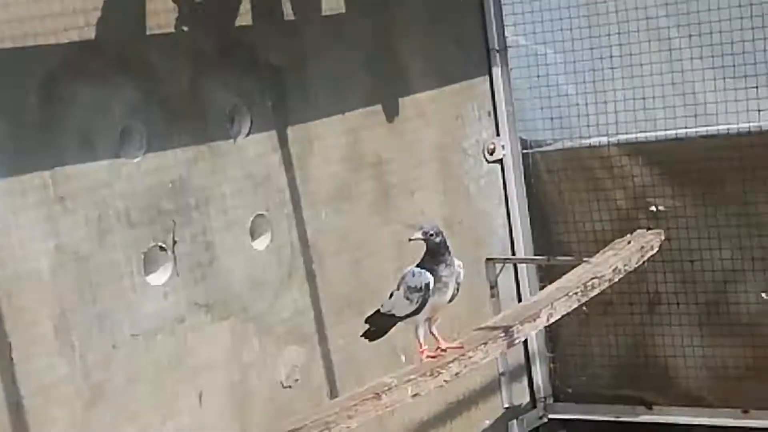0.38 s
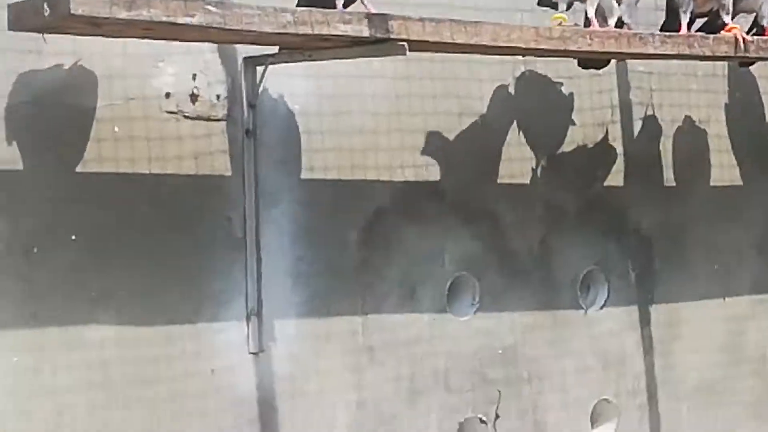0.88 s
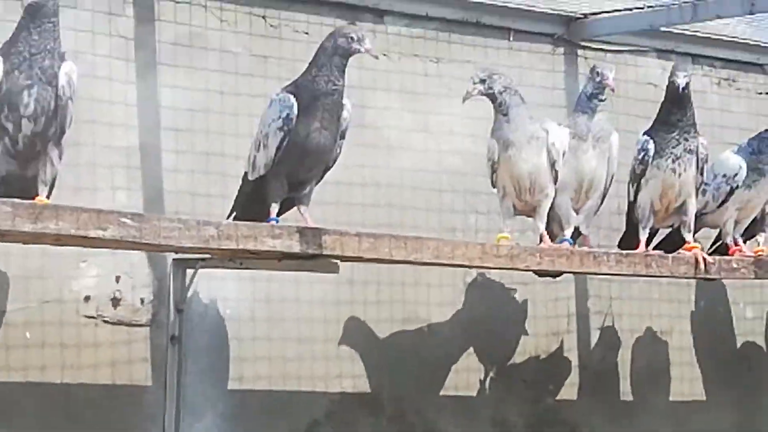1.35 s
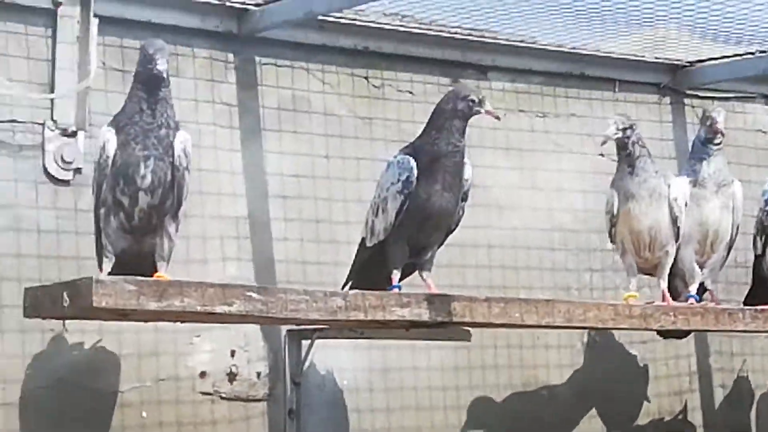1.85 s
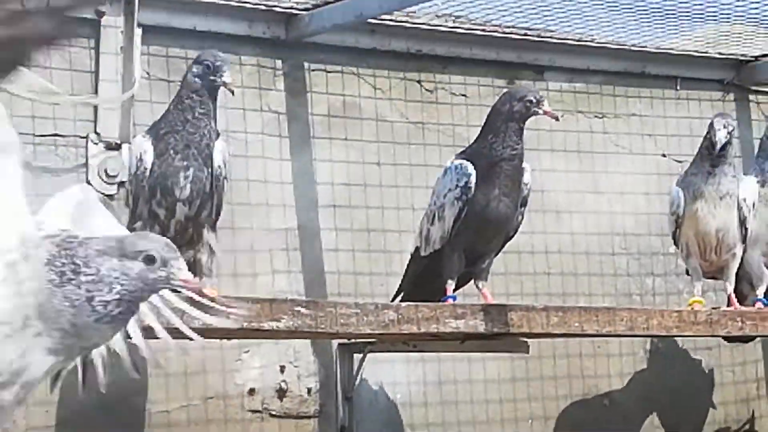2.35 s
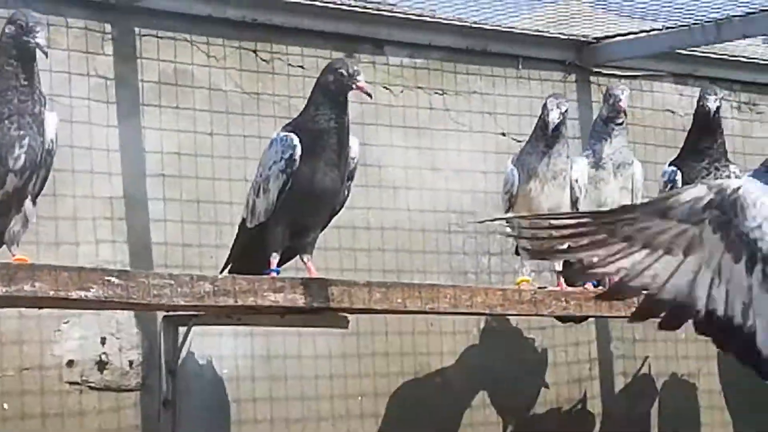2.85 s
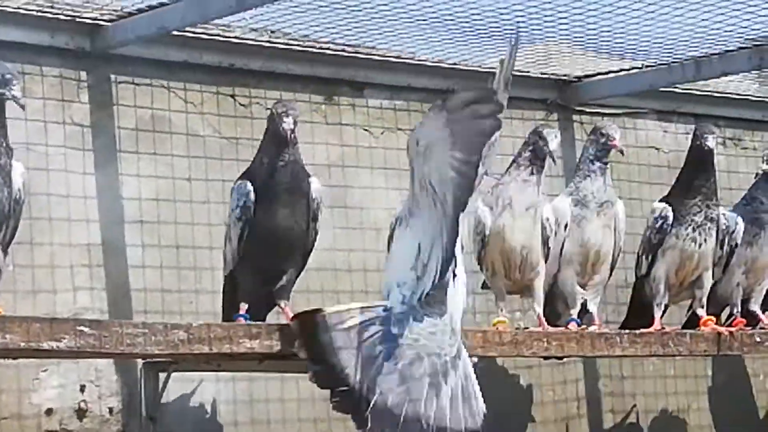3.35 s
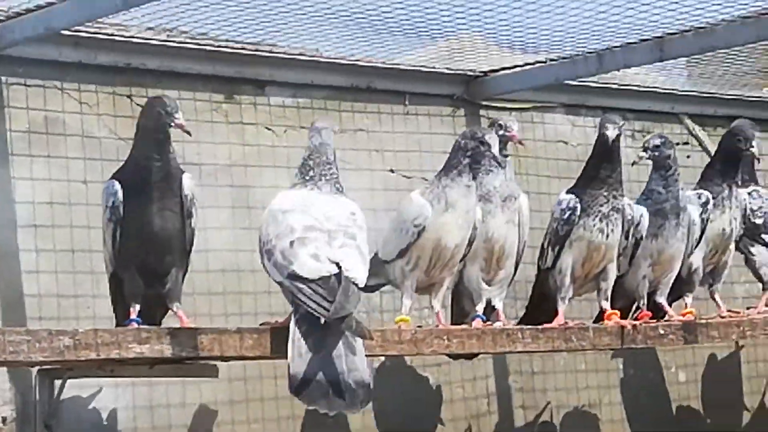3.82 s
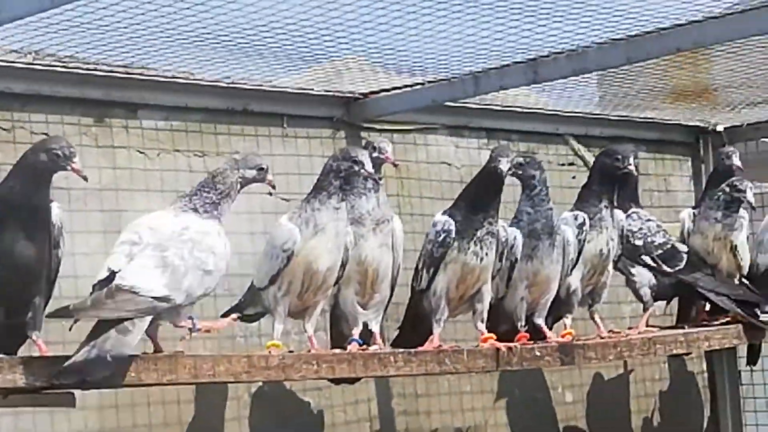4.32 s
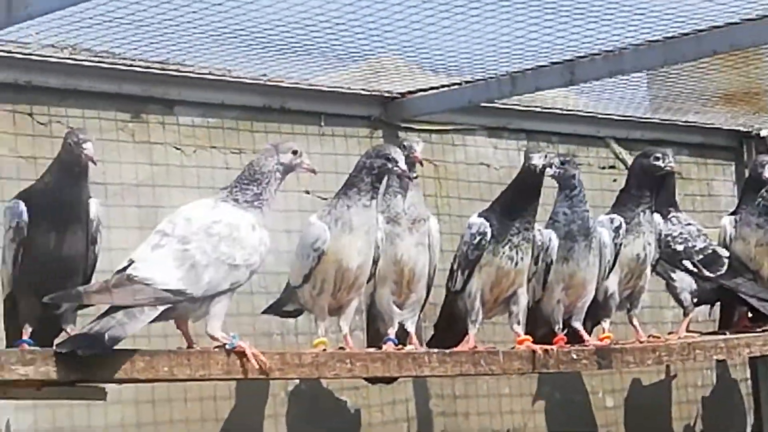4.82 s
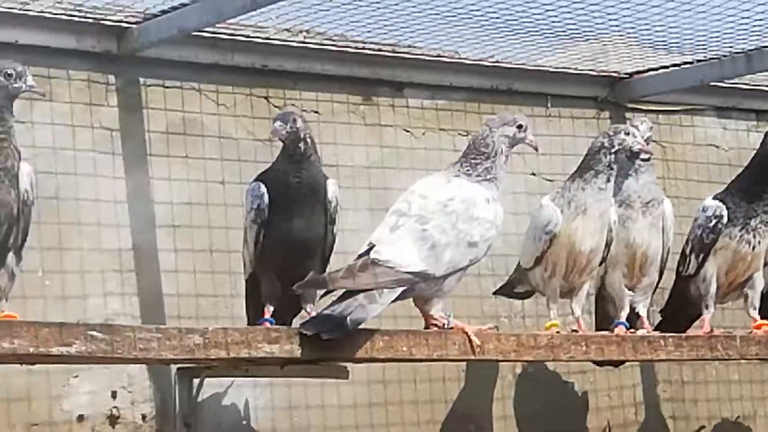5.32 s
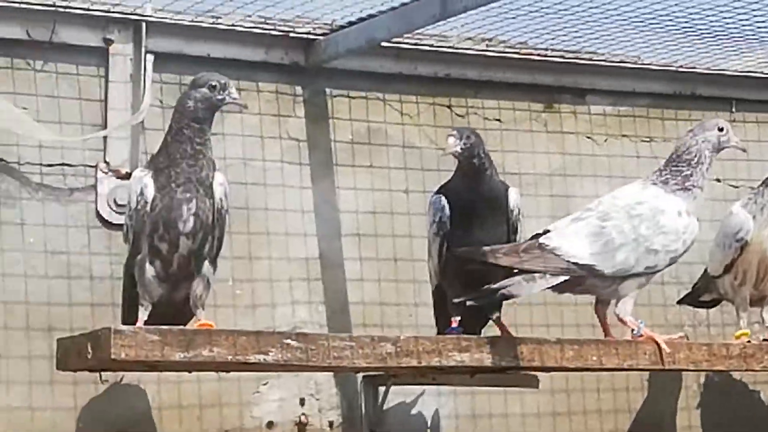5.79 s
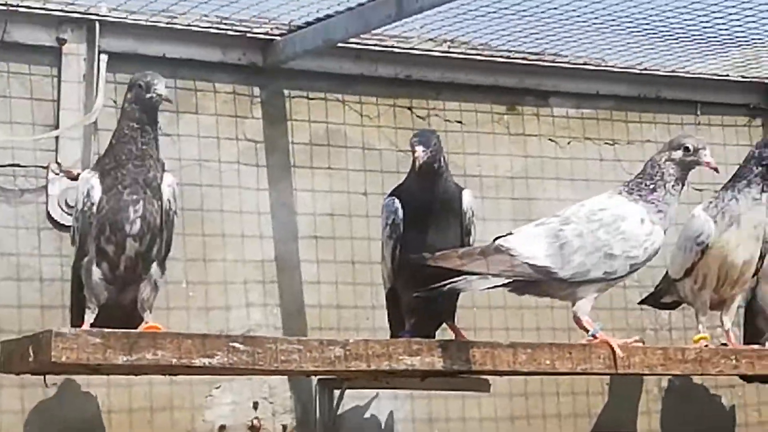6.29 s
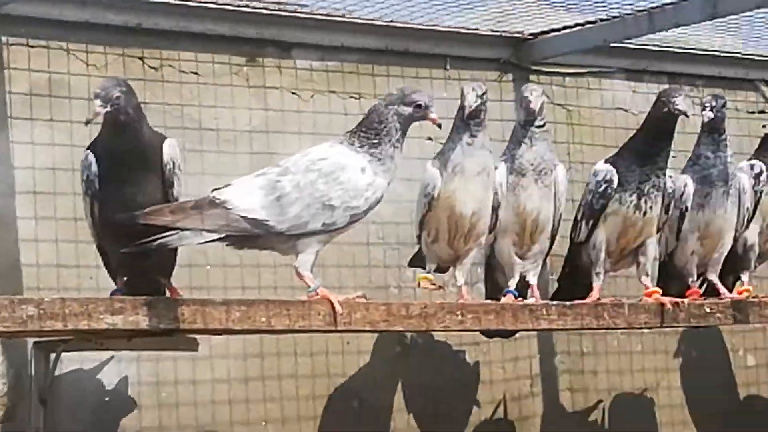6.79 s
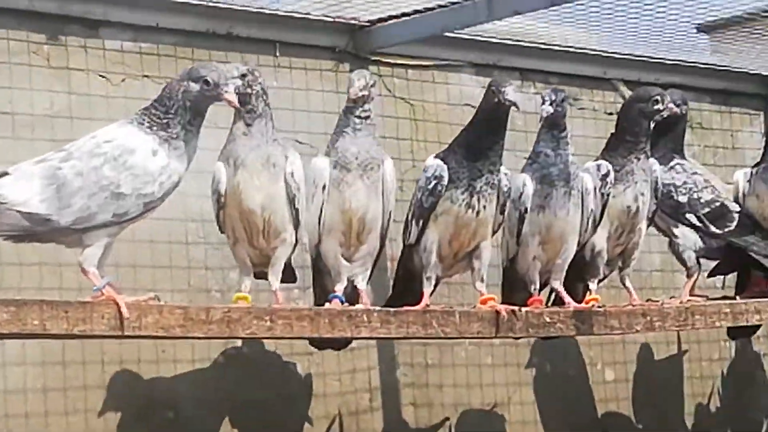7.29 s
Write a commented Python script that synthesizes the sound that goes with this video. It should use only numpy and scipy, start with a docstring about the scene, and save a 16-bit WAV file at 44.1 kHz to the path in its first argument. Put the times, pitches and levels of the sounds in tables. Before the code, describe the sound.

Young pigeons cheep hoarsely in a crowd inside a wire loft while one bird flaps past, claps its wings loudly and lands scuffling among soft coos.

```python
"""Young birds cheep hoarsely in a crowd on the right of an open wire pigeon loft; their calls are shaky tones.
Two adults coo and short hollow hoots sound ahead, as throbbing near-pure tones, among clucks and airy bands.
One pigeon flies past with swishing strokes of shaped noise, snapping quills and one loud resonant clap,
and lands in a scuffle of decaying knocks. A small bird twitters in upward chirps.
Draught and a light breeze buffet a two-port microphone as lumpy low noise over a far rumble."""
import sys
import numpy as np
from scipy import signal
from scipy.fft import rfft, irfft, next_fast_len
from scipy.io import wavfile
from scipy.ndimage import uniform_filter1d, map_coordinates

SR = 44100
rng = np.random.default_rng(int(sys.argv[2]) if len(sys.argv) > 2 else 0)


def file_out(sig):
    """Save sig as 16-bit WAV at sys.argv[1]."""
    # one column per channel
    cols = np.atleast_2d(sig).T
    # limit, then scale
    lim = np.clip(cols, -1, 1)
    pcm = np.round(lim * 32767).astype(np.int16)
    wavfile.write(sys.argv[1], SR, pcm)


def ratio(d):
    """dB to gain"""
    e = np.asarray(d, float) / 20
    return 10 ** e


N = 337806
LAG = 26  # samples by which the left port hears later a source on the right

# relative spectrum of feather hiss: f/Hz, level/dB
FEATHER_SPECTRUM = [(2000, -120), (2500, -9), (4500, -2), (8000, 2.5), (12000, -5.5), (15500, -14)]
# churned air while the bird brakes: start t/s, rise/s, hold/s, fall/s, level/dB
BRAKING_AIR = (2.27, .08, .45, .25, -59)
# feathers rustling in flight: start t/s, rise/s, hold/s, fall/s, hiss level/dB, whoosh level/dB
FLIGHT_RUSTLE = (.8, 1.03, 0.32, 1, -57.5, -55.5)


def unit(x):
    """Normalization: scale to rms 1."""
    return x / np.sqrt(np.mean(x ** 2) + 1e-20)


def along(points, hz):
    """Logarithmic frequency scale: (f/Hz, value) points interpolated on a log axis."""
    f, v = np.transpose(points)
    return np.interp(np.log(hz + 1), np.log(f + 1), v)


def curve(rows):
    """Linear interpolation: one value per sample for the column after the time."""
    return np.interp(np.arange(N) / SR, *np.transpose(rows))


def plateau(*steps):
    """Trapezoidal envelope, 0 to 1 and back: start, rise, hold and fall in seconds."""
    return np.interp(np.arange(N) / SR, np.cumsum(steps), [0, 1, 1, 0])


def wobble(rate, size=N, order=3):
    """Band-limited random modulation: a curve through random knots, rate of them a second."""
    knots = rng.standard_normal(int(size * rate / SR) + 4)
    return map_coordinates(knots, [np.arange(size) * rate / SR], order=order)


def add(track, start, sound):
    """Superposition: mix a sound in at a time in seconds."""
    part = track[max(round(start * SR), 0):][:len(sound)]
    part += sound[:len(part)]


def filtered(x, response):
    """Linear filtering: the spectrum of x times a complex response of frequency."""
    m = next_fast_len(N + SR // 2)
    return irfft(rfft(x, m) * response(np.fft.rfftfreq(m, 1 / SR)), m)[..., :N]


def noise(spectrum, alike=((1, 0),)):
    """Partial coherence: stereo noise of rms 1 with a spectrum and a left-right correlation."""
    def gains(hz):
        angle = np.arccos(np.clip(along(alike, hz), -1, 1)) / 2
        return ratio(along(spectrum, hz)) * np.array([np.cos(angle), np.sin(angle)])

    mid, side = filtered(rng.standard_normal((2, N)), gains)
    return unit(np.array([mid + side, mid - side]))


def band(size, hz, width_hz):
    """Band-pass filtering: noise of rms 1 in a Gaussian band round hz."""
    f = np.fft.rfftfreq(size, 1 / SR)
    response = np.exp(-((f - hz) / width_hz) ** 2)
    return unit(irfft(rfft(rng.standard_normal(size)) * response, size))


def patchy(x, depth_db):
    """Time-frequency modulation: random patches of gain, then rms 1."""
    z = signal.stft(x, nperseg=512)[2]
    field = rng.standard_normal(z.shape[1:])
    field = uniform_filter1d(uniform_filter1d(field, 3, 0), 16, 1)
    return unit(signal.istft(z * ratio(depth_db * unit(field)), nperseg=512)[1][:, :N])


def loft(x, wet_db, lag):
    """Time difference and reverberation: the left port lags; the reverberant tail is new every 0.4 s."""
    # reverberation time of the loft: f/Hz, t60/s
    decay_times = [(300, 0.43), (2000, 0.37), (6000, 0.19), (14000, 0.14)]
    out = np.array([np.pad(x, (lag, 0))[:N], x])
    step = SR * 4 // 10
    for a in range(0, N, step):
        hz, t, z = signal.stft(rng.standard_normal((2, SR // 4)), SR, nperseg=256)
        decay = ratio(-60 * t / along(decay_times, hz)[:, None])
        tail = signal.istft(z * decay, SR, nperseg=256)[1]
        wet = signal.fftconvolve(x[None, a:a + step], tail / np.linalg.norm(tail[0]), axes=1)
        part = out[:, a + 200:][:, :wet.shape[1]]
        part += ratio(wet_db) * wet[:, :part.shape[1]]
    return out / np.sqrt(1 + ratio(2 * wet_db))


def air():
    """Turbulent pressure fluctuation: lumpy buffeting at the ports over a steady far rumble."""
    # air on the ports, before random lumps: t/s, level/dB
    draught = [(0.0, -46), (0.13, -63), (0.17, -40.5), (0.3, -44), (0.45, -60), (2.05, -51.5), (2.18, -56),
               (2.43, -55), (2.47, -47), (2.64, -46), (2.77, -49), (3.07, -51.5), (3.15, -59), (5.01, -56),
               (5.18, -56.5), (7.66, -57.5)]
    # relative spectrum of the buffeting: f/Hz, level/dB
    buffet_spectrum = [(15, -9.5), (30, -8), (80, -3.5), (160, -12), (350, -27.5), (600, -120)]
    # relative spectrum of far traffic: f/Hz, level/dB
    rumble_spectrum = [(35, -63), (60, -19), (92, -15), (113, -8.5), (160, -3), (188, -8.5), (221, -9),
                       (618, -18), (1180, -18.5), (2000, -10.5), (2600, -10), (4400, -120)]
    # left-right correlation: f/Hz, correlation/1
    likeness = [(60, 0.99), (130, 0.99), (290, 0.71), (640, -0.42), (1400, -0.12)]
    rumble_db = -56.5
    lumps = ratio(curve(draught) + 2.4 * wobble(8.7))
    return lumps * noise(buffet_spectrum, likeness) + ratio(rumble_db) * noise(rumble_spectrum, likeness)


def twitter():
    """Linear frequency modulation: each chirp of a small bird sweeps up through the treble in 25 ms."""
    # quick upward chirps: t/s, level/dB
    chirps = [(6.71, -41.5), (6.748, -46), (6.769, -41.5), (6.805, -49)]
    out, t = np.zeros(N), np.arange(SR // 40) / SR
    chirp = np.hanning(len(t)) * np.sin(2 * np.pi * (7000 * t + 55000 * t ** 2))
    for s, db in chirps:
        add(out, s, ratio(db) * chirp)
    return out


def cheep(length, hz, scatter_hz, overtone_db=-21, flutter_db=6.0):
    """Random frequency and amplitude modulation of a syrinx tone; also returns its swell."""
    sag_per_s = 0.123  # a call sinks by this share of its pitch each second as the breath runs out
    size = int(length * SR) + 9
    sag = sag_per_s * (length / 2 - np.arange(size) / SR)
    shake = 1.3 * wobble(420, size, order=1) + .35 * wobble(25, size, order=1)
    phase = 2 * np.pi * np.cumsum(hz * (1 + sag) + scatter_hz * shake) / SR
    u = np.arange(size) / size
    swell = np.minimum(u / .13, 1) ** 1.5 * np.minimum((1 - u) / .3, 1)
    # only calls below 6600 Hz have the octave overtone
    tone = np.sin(phase) + ratio(overtone_db) * (hz < 6600) * np.sin(2 * phase)
    return unit(tone * ratio(flutter_db * wobble(129.9, size, order=1))) * swell, swell


def cheeps(table):
    """Superposition of a table of calls: their tones, and the power of the air that drives them."""
    tones, effort = np.zeros((2, N))
    for s, length, hz, scatter_hz, db in table:
        tone, swell = cheep(length, hz, scatter_hz)
        add(tones, s, ratio(db) * tone)
        add(effort, s, (ratio(db) * swell) ** 2)
    return tones, effort


def flock(count=450):
    """Incoherent summation: clear cheeps, many weak ones, rasping breath with the clear ones, and rustle."""
    # the clearest single cheeps: start t/s, length/s, pitch f/Hz, pitch scatter scale/Hz, level/dB
    clear_cheeps = [(0.0, 0.11, 4110, 76, -37), (0.049, 0.16, 4990, 210, -40), (0.194, 0.13, 3800, 36, -38),
                    (0.351, 0.12, 5460, 207, -38.5), (0.415, 0.093, 4740, 115, -38.5),
                    (0.51, 0.094, 4890, 215, -38), (0.425, 0.09, 9260, 52, -51),
                    (0.483, 0.084, 3915, 64, -44), (0.577, 0.17, 5850, 150, -43.5),
                    (1.1, 0.083, 5760, 51, -47.5), (1.125, 0.16, 3396, 23, -44.5),
                    (1.26, 0.093, 2800, 46, -49), (1.29, 0.12, 3490, 60, -42),
                    (1.252, 0.081, 4660, 180, -41), (1.351, 0.12, 4250, 220, -41),
                    (1.447, 0.18, 4123, 158, -37), (1.555, 0.07, 4610, 63, -39),
                    (1.62, 0.16, 2735, 62, -47.5), (1.7, 0.15, 6060, 270, -42),
                    (1.749, 0.16, 3485, 106, -47), (2.255, 0.093, 5870, 120, -44.5),
                    (2.653, 0.078, 6300, 210, -41.5), (2.68, 0.19, 3454, 51, -45),
                    (3.007, 0.066, 4400, 165, -37), (3.062, 0.14, 3640, 79, -39),
                    (3.226, 0.1, 5720, 280, -35), (3.311, 0.099, 4750, 120, -39.5),
                    (3.433, 0.12, 4620, 79, -42), (3.47, 0.086, 5720, 270, -40),
                    (3.563, 0.17, 5640, 59, -40), (3.643, 0.089, 5720, 70, -43),
                    (3.668, 0.21, 4540, 186, -34.5), (3.869, 0.088, 4420, 107, -39.5),
                    (3.949, 0.1, 4100, 157, -39), (4.17, 0.18, 5100, 75, -52), (4.323, 0.1, 4810, 92, -44),
                    (4.411, 0.066, 3610, 96, -45), (4.428, 0.13, 3040, 109, -46),
                    (4.57, 0.082, 5420, 74, -43), (4.641, 0.094, 4390, 69, -43.5),
                    (4.892, 0.09, 4630, 69, -41.5), (4.947, 0.077, 5440, 73, -37.5),
                    (4.985, 0.063, 3830, 127, -39.5), (5.105, 0.058, 3630, 68, -37),
                    (5.207, 0.096, 4766, 103, -35.5), (5.376, 0.09, 7930, 110, -47),
                    (5.389, 0.28, 5270, 77, -40), (5.527, 0.1, 2656, 46, -48),
                    (5.69, 0.097, 2827, 100, -48), (5.795, 0.064, 4860, 66, -35),
                    (5.898, 0.066, 5100, 123, -35), (6.0, 0.043, 5000, 110, -36),
                    (6.06, 0.041, 4805, 77, -37), (5.9, 0.37, 2455, 32, -55),
                    (6.08, 0.24, 7250, 450, -43.5), (6.131, 0.094, 3930, 220, -39.5),
                    (6.215, 0.056, 5880, 170, -33.5), (6.28, 0.054, 6060, 210, -35.5),
                    (6.2, 0.051, 4880, 165, -35), (6.285, 0.082, 4820, 100, -36),
                    (6.368, 0.2, 4130, 102, -41.5), (6.45, 0.22, 2940, 124, -46.5),
                    (6.473, 0.13, 3490, 126, -42.5), (6.69, 0.15, 2716, 37, -48),
                    (7.005, 0.067, 2720, 48, -54), (7.375, 0.077, 2660, 61, -48),
                    (7.081, 0.21, 3745, 20, -49.5), (7.207, 0.31, 8130, 82, -49),
                    (7.131, 0.16, 6130, 110, -41.5), (7.223, 0.14, 4100, 62, -39.5),
                    (7.35, 0.13, 5500, 160, -40.5), (7.389, 0.064, 3760, 96, -38),
                    (7.461, 0.091, 5620, 180, -38), (7.486, 0.047, 6360, 95, -38),
                    (7.55, 0.1, 5940, 330, -35), (7.579, 0.059, 4080, 38, -40.5)]
    # the rest of the flock, too dense to tell apart: t/s, relative level/dB
    crowd = [(0.0, -40), (0.43, -46), (0.77, -47.5), (1.11, -50), (1.43, -44), (2.52, -48), (3.69, -41),
             (4.95, -45.5), (5.08, -46), (5.65, -47.5), (6.36, -43), (6.87, -47.5), (7.12, -46.5),
             (7.36, -45), (7.66, -38.5)]
    # relative spectrum of rasp and rustle: f/Hz, level/dB
    crowd_spectrum = [(530, -28), (900, -23), (1770, -20.5), (2540, -7.5), (3420, -3), (4130, 2),
                      (4880, 3.5), (6580, -6), (8340, -9), (11600, -23.5), (15500, -38.5)]
    tones, effort = cheeps(clear_cheeps)
    when, length, pitch, size, rough = rng.random((count, 5)).T
    weak = [when * N / SR, .05 + .12 * length, 2600 * 2.8 ** pitch, 50 + 130 * rough, -7 * size]
    babble = cheeps(np.transpose(weak))[0]
    level = ratio(curve(crowd))
    rasp = np.sqrt(np.abs(uniform_filter1d(effort, 400)))
    rustle = patchy(noise(crowd_spectrum), depth_db=3.5) * (0.89 * level + ratio(-10) * rasp)
    calls = tones + twitter() + ratio(-8) * level * unit(babble)
    return loft(calls, wet_db=1.5, lag=LAG) + rustle


def airy_bands():
    """Band-limited noise: airy low parts of cheeps, and other soft bands of breath, without a tone."""
    # soft airy bands: start t/s, length/s, centre f/Hz, width/Hz, level/dB
    soft_bands = [(0.0, 0.12, 1720, 265, -44), (0.083, 0.25, 1690, 282, -50), (0.61, 0.21, 940, 250, -56.5),
                  (4.029, 0.14, 1846, 300, -55), (4.517, 0.28, 1790, 400, -56.5),
                  (5.049, 0.33, 1885, 418, -56.5), (6.077, 0.22, 9600, 2600, -48),
                  (7.05, .34, 1790, 378, -55.5)]
    out = np.zeros(N)
    for s, length, hz, width_hz, db in soft_bands:
        size = int(length * SR)
        add(out, s, ratio(db) * signal.windows.tukey(size, .5) * band(SR // 2, hz, width_hz)[:size])
    return out


def clucks():
    """Modulated syrinx tones: clucks and whines from ahead."""
    # start t/s, length/s, pitch f/Hz, pitch scatter scale/Hz, level/dB
    cluck_calls = [(.2, 0.25, 1775, 11, -53), (.8, 0.059, 1470, 39, -53.5), (.9, 0.16, 900, 32, -60),
                   (1.965, 0.026, 788, 44, -50.5), (2.37, 0.272, 1490, 31, -58),
                   (2.572, 0.039, 810, 28, -42), (6.825, 0.16, 915, 50, -65.5)]
    return cheeps(cluck_calls)[0]


def throat(calls, throb_db, throb_rate, scatter_hz, haze):
    """Amplitude and frequency modulation: a near-pure closed-beak tone throbs, shakes and can gurgle."""
    gurgle_hz = 27  # the throat opens and shuts this often in a rolling coo
    out = np.zeros(N)
    for rows in calls:
        s, hz, db, depth = np.transpose(rows)
        t = np.arange(s[0], s[-1], 1 / SR)
        pitch = np.interp(t, s, hz) + scatter_hz * wobble(58.9, len(t))
        phase = 2 * np.pi * np.cumsum(pitch) / SR
        breathy = 1 + haze * wobble(250, len(t))  # turbulent air spreads a haze round the tone
        shut = np.cos(np.pi * gurgle_hz * t + .5 * wobble(12, len(t))) ** 4
        gurgle = 1 - np.clip(np.interp(t, s, depth), 0, 1) * shut
        throb = ratio(throb_db * wobble(throb_rate, len(t))) * gurgle
        add(out, s[0], np.sqrt(2) * ratio(np.interp(t, s, db)) * throb * np.sin(phase) * breathy)
    return out


def hoots():
    """Envelope shaping: each hoot swells quickly, holds and fades while its pitch sags."""
    # short hollow hoots: start t/s, hold/s, pitch f/Hz, level/dB
    hoot_calls = [(.6, 0.083, 678, -41), (.745, 0.094, 660, -60), (.9, 0.059, 640, -60),
                  (1.775, 0.017, 686, -52), (1.835, 0.015, 680, -51.5), (3.412, 0.0059, 674, -47),
                  (3.485, 0.035, 676, -57), (4.345, 0.011, 496, -59)]
    attack_s, release_s, sag_hz_per_s = 0.024, 0.029, 45
    edge_db = np.array([-18, 0, 0, -18])  # level at the ends of the swell and fade
    calls = []
    for start, held, hz, db in hoot_calls:
        s = np.cumsum([0, attack_s, held, release_s])
        calls.append(np.transpose([start + s, hz - sag_hz_per_s * s, db + edge_db, 0 * edge_db]))
    return throat(calls, throb_db=1.5, throb_rate=60, scatter_hz=8, haze=.32)


def coos():
    """Pitch glide: the first coo sinks to a long low note, the second arches up and sinks; both gurgle."""
    # one list per coo: t/s, pitch f/Hz, level/dB, gurgle depth/1
    coo_calls = [
        [(2.57, 441.4, -58, 0.9), (2.68, 400, -49, 1), (2.72, 346.7, -50.5, 0.5), (2.86, 346, -50, .3),
         (3.03, 336, -57.5, 0.5), (3.07, 330, -77, .2)],
        [(3.82, 298, -67, .1), (3.84, 305, -62, .1), (3.92, 400.7, -54, 0.2), (4.048, 454.4, -59.5, 0.7),
         (4.09, 402.6, -54.5, 1), (4.17, 369, -49, 0.7), (4.22, 347.4, -45.5, 0), (4.29, 352.5, -42.5, 0.8),
         (4.35, 319, -55, 1), (4.41, 323, -64, .9)],
    ]
    return throat(coo_calls, throb_db=1.5, throb_rate=30, scatter_hz=8, haze=.25)


def scuffle(count=45):
    """Damped oscillation: knocks of unsteady pitch die fast; weak ones crowd in while the bird brakes."""
    # knocks of wings and claws on perch and wall: t/s, pitch f/Hz, level/dB
    clear_knocks = [(.968, 1454, -43), (2.342, 1024, -38.5), (2.342, 278, -39.5), (2.425, 1270, -45),
                    (2.468, 1010, -40.5), (2.485, 653, -41), (2.54, 906, -32.5), (2.54, 200, -36.5),
                    (2.575, 1540, -33.5), (2.612, 1260, -37.5), (2.676, 1130, -38.5), (2.736, 1117, -39),
                    (2.794, 1183, -31), (2.795, 182, -47), (2.797, 1755, -31), (2.872, 1060, -45),
                    (2.9, 560, -43), (2.903, 1016, -41.5), (2.925, 230, -42), (2.982, 974, -39.5)]
    t60_s, spread = 0.079, 0.077  # pitch shakes by this share
    out, t = np.zeros(N), np.arange(SR // 8) / SR
    when, pitch, size = rng.random((count, 3)).T
    weak_s = BRAKING_AIR[0] + sum(BRAKING_AIR[1:4]) * when
    for s, hz, db in [*clear_knocks, *zip(weak_s, 350 * 6 ** pitch, -46 - 8 * size)]:
        phase = 2 * np.pi * hz * np.cumsum(1 + spread * wobble(268, len(t))) / SR
        add(out, s, ratio(db - 60 * t / t60_s) * np.sin(phase) * np.minimum(t / 0.0023, 1))
    return out


def crackle(count=90):
    """Impulsive noise: quills snap, clear ticks among weak ones all through the flight."""
    # quills snapping between the strokes: t/s, level/dB
    ticks = [(0.8465, -46), (1.045, -50), (1.3773, -50), (1.49, -47), (1.5204, -39), (1.8018, -42),
             (1.9974, -41), (2.2682, -32), (2.4972, -39), (2.581, -31), (2.7242, -41)]
    when, size = rng.random((count, 2)).T
    weak_s = FLIGHT_RUSTLE[0] + sum(FLIGHT_RUSTLE[1:4]) * when
    snaps = np.zeros(N)
    decay_db = -60 * np.arange(SR // 40) / SR / .025  # 60 dB in 25 ms
    for s, db in [*ticks, *zip(weak_s, -51 - 9 * size)]:
        add(snaps, s, ratio(db + decay_db))
    return snaps * noise(FEATHER_SPECTRUM)[0]


def wings():
    """Aerodynamic noise: each stroke pushes air into feather hiss, a whoosh and a low thump."""
    # wing strokes, before the leads below: t/s, hiss level/dB, whoosh level/dB, thump level/dB
    strokes = [(0.9696, -46.5, -44, -54), (1.1074, -50, -67, -60), (1.397, -41, -53, -52),
               (1.529, -49, -39, -57), (1.6705, -53, -55, -54), (1.746, -48, -59, -62),
               (1.846, -46, -48, -58), (1.923, -42.5, -46, -39), (2.046, -38, -43.5, -51),
               (2.183, -27, -42, -44), (2.313, -29, -43.5, -57), (2.417, -41.5, -62, -55),
               (2.4708, -41, -53, -33), (2.5408, -31, -34, -42), (2.675, -35.5, -44, -26.5),
               (2.736, -50, -46.5, -46), (2.87, -38.5, -44, -52), (2.928, -45, -42.5, -39),
               (3.1394, -48, -45, -62), (4.4546, -54, -47, -48), (7.0736, -62, -47.5, -56)]
    # relative spectrum of the whoosh: f/Hz, level/dB
    whoosh_spectrum = [(150, -120), (250, -4), (600, -10), (1200, -1.5), (2200, 0.5), (3500, -9),
                       (5000, -120)]
    # the close sweep of the bird: rise/s, fall/s, level/dB
    swoop = (0.026, 0.036, -30.5)
    # relative spectrum of the sweep: f/Hz, level/dB
    swoop_spectrum = [(500, -120), (800, -4.5), (2200, 6), (3500, -1), (5200, 1), (9000, -7), (15500, -29)]
    # relative spectrum of the braking air: f/Hz, level/dB
    churn_spectrum = [(80, -120), (150, -8), (400, -2), (900, -15), (1800, -9), (3000, -120)]
    rise_s, t60_s, swoop_s = .004, .048, 2.119
    hiss_leads_s, whoosh_leads_s, thump_leads_s = 0.003, 0.003, .008
    hiss, whoosh, thump = np.zeros((3, N))
    t = np.arange(SR // 3) / SR
    swell = np.sin(np.pi / 2 * np.minimum(t / rise_s, 1)) ** 2
    swell = swell * ratio(-60 * np.maximum(t - rise_s, 0) / t60_s)
    push = -np.sin(2 * np.pi * 45 * t) * ratio(-60 * t / .11)
    for s, hiss_db, whoosh_db, thump_db in strokes:
        add(hiss, s - hiss_leads_s, ratio(hiss_db) * swell)
        add(whoosh, s - whoosh_leads_s, ratio(whoosh_db) * swell)
        add(thump, s - thump_leads_s, ratio(thump_db) * push)
    rise, fall, db = swoop
    late = np.arange(N) / SR - swoop_s
    sweep = ratio(db + 1.5 * wobble(300)) * np.exp(-np.abs(late) / np.where(late < 0, rise, fall))
    *steps, db = BRAKING_AIR
    churn = plateau(*steps) * ratio(db + 6.5 * wobble(24))
    *steps, hiss_db, whoosh_db = FLIGHT_RUSTLE
    ruffle = plateau(*steps) * ratio(4 * wobble(35))
    hiss, whoosh = hiss + ratio(hiss_db) * ruffle, whoosh + ratio(whoosh_db) * ruffle
    low = whoosh * patchy(noise(whoosh_spectrum), depth_db=3.0)[0] + churn * noise(churn_spectrum)[0] + thump
    high = hiss * ratio(2.6 * wobble(400)) * noise(FEATHER_SPECTRUM)[0] + sweep * noise(swoop_spectrum)[0]
    return high, low


def clap():
    """Resonance: a sharp click with a short rattle excites stiff wing tips as they meet."""
    # answers of nearby walls: delay/s after the clap time, relative level/dB
    walls = [(.0016, -11), (.0045, -9), (.006, -11), (.008, -11)]
    # wing-tip resonances: f/Hz, width/Hz, level/dB
    resonances = [(139, 160, -1.5), (1110, 140, 3), (4250, 630, 9), (8460, 1200, 4), (11800, 1700, -10)]
    clap_s, clap_db = 2.7929, 5
    blows = np.zeros(N)
    t = np.arange(SR // 20) / SR
    for delay, db in [(0.00075, 0)] + walls:
        rattle = 0.42 * rng.standard_normal(len(t)) * ratio(-60 * t / 0.0083)
        add(blows, clap_s + delay, ratio(clap_db + db) * (rattle + (t == 0)))

    def ring(f):
        total = 0
        for k, (centre, width, db) in enumerate(resonances):
            damping = 1j * f * width
            total = total + (-1) ** k * ratio(db) * damping / (centre * centre - f * f + damping)
        return total

    return filtered(blows, ring)


def scene():
    """Superposition at the two ports; low sounds come from nearly straight ahead."""
    feathers, strokes = wings()
    low = strokes + scuffle() + coos() + hoots() + airy_bands() + clucks()
    ahead = loft(low, wet_db=-10, lag=2)
    flight = loft(feathers + crackle(), wet_db=-1.5, lag=LAG) + loft(clap(), wet_db=-15.5, lag=LAG)
    return air() + flock() + ahead + flight


def low_pass(x):
    """Removes everything above the highest recorded frequency."""
    return signal.sosfilt(signal.butter(12, 15830, fs=SR, output="sos"), x)


def record(dry):
    """Port shading and saturation: the left port is duller, peaks round off, and the top is cut."""
    # left port against right: f/Hz, level/dB
    port_balance = [(60, 0.5), (110, 0), (200, 0), (380, -2), (700, -4.5), (1290, -5), (2380, -8.0),
                    (4400, -9.5), (8120, -13), (15000, -2.5)]
    top_hz = 15800

    def ports(hz):
        left = ratio(along(port_balance, hz))
        return np.array([left, hz ** 0]) * np.sqrt(2 / (1 + left ** 2))  # keeps the summed power

    shaded = filtered(dry, ports)
    rounded = shaded / (1 + np.abs(shaded / .97) ** 8) ** (1 / 8)
    mix = filtered(rounded, lambda hz: hz < top_hz)
    return low_pass(mix)


dry = scene()
out = record(dry)
file_out(out)
```